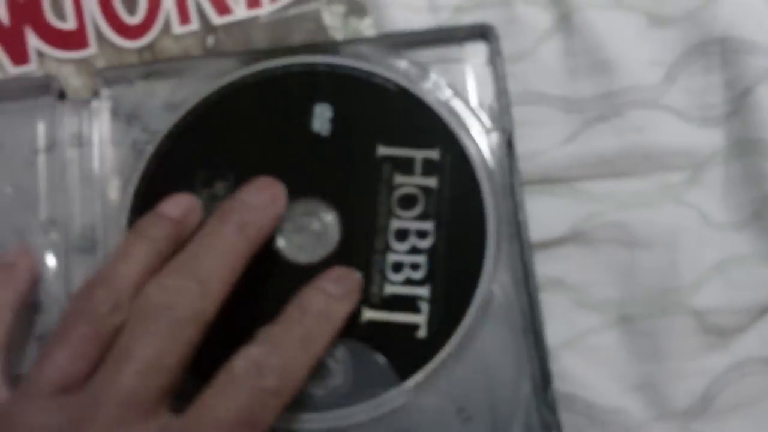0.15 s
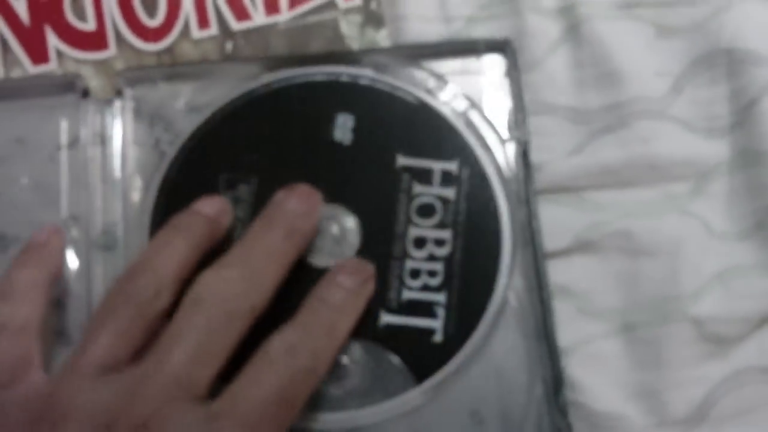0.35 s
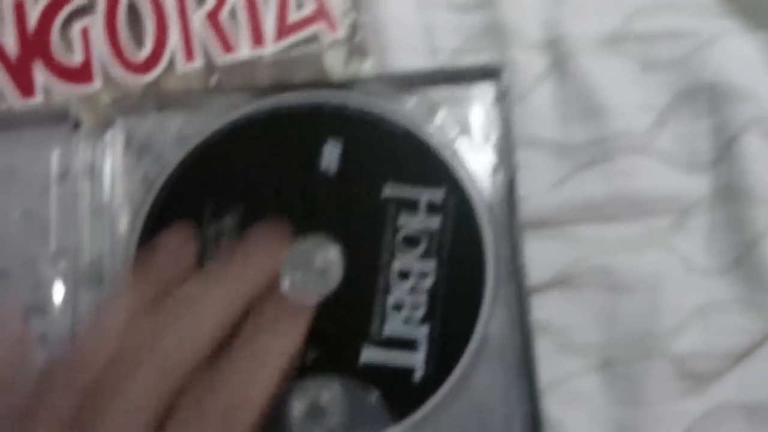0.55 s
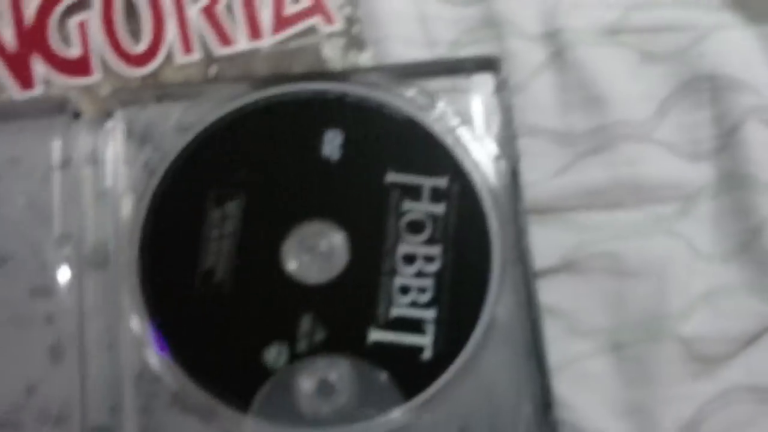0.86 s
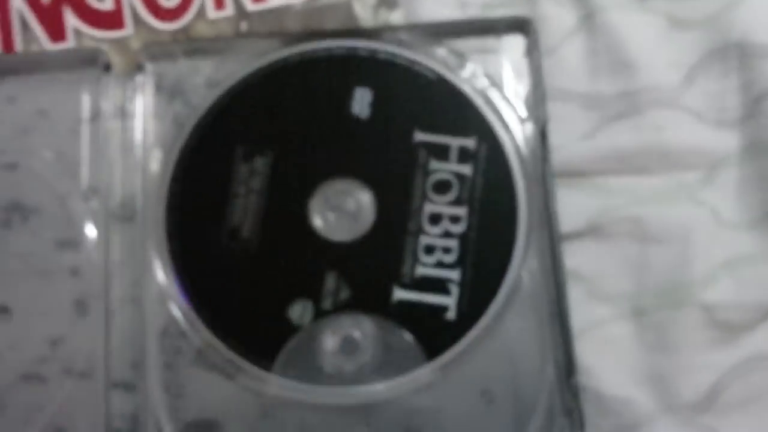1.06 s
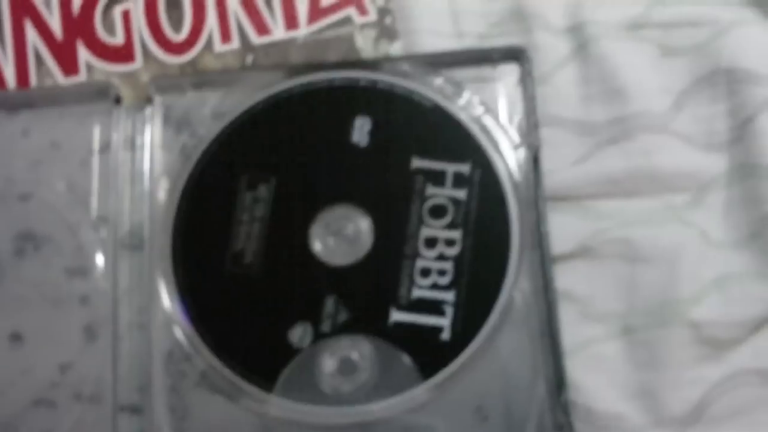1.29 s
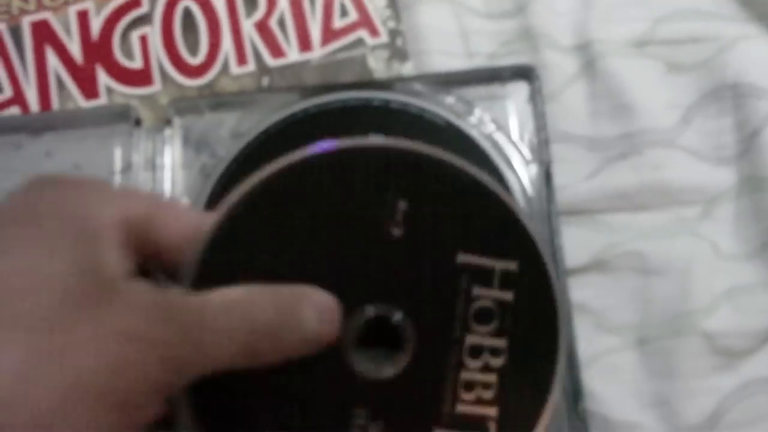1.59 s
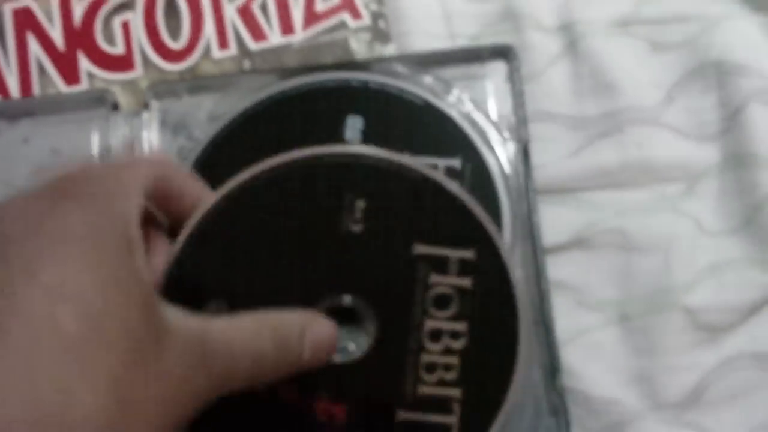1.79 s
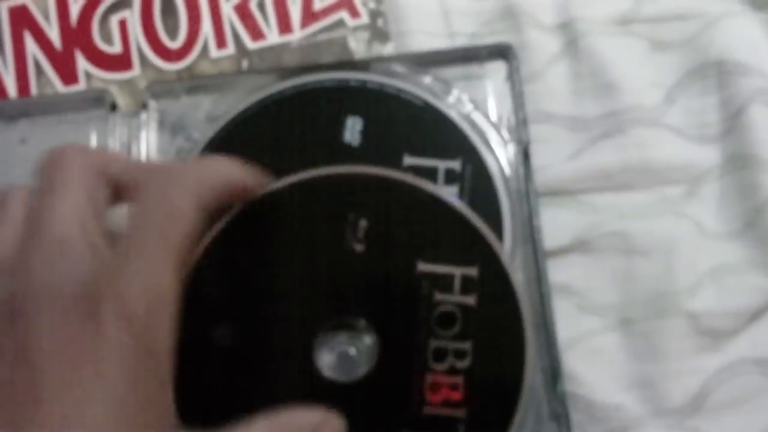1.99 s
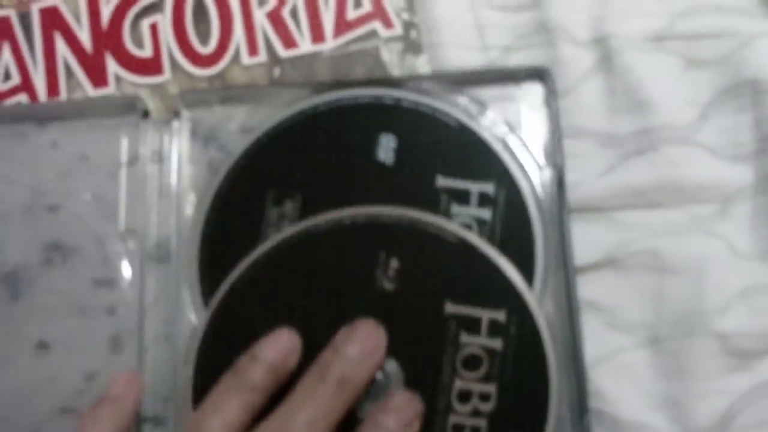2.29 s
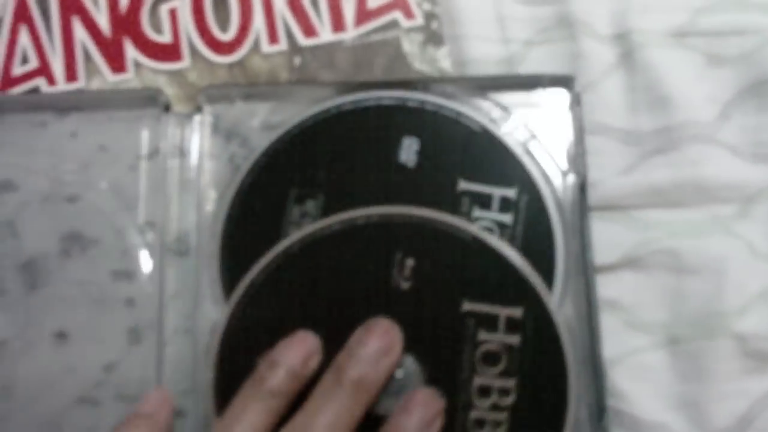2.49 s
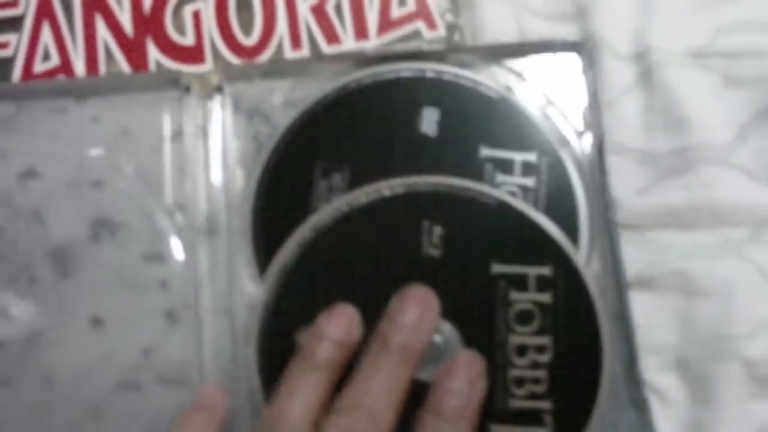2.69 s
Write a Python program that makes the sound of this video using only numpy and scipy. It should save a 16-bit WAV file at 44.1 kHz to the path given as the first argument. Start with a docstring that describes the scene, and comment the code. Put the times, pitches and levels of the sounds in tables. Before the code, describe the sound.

Discs click into a plastic case close to the microphone. One snaps down with a soft thump, then after a lull another taps, scrapes lightly and clicks home. Faint hiss fills the small room behind.

```python
"""Small, soft room, close microphone: a disc is pressed onto the hub of a plastic case lying on a bed.
A second disc is laid in, rattles into place and snaps home. Each contact knocks the case, rings the disc
and, where an edge slips off a catch, gives a very bright snap. The tray thumps against the bedding.
Fingers slide the disc; it scrapes over the hub and its rim squeaks on the tray.
Behind it: faint room noise, a high hiss that flares up, and a thin whine."""
import sys
import numpy as np
from scipy import signal
from scipy.fft import rfft, irfft, next_fast_len
from scipy.io import wavfile

SR = 44100
rng = np.random.default_rng(int(sys.argv[2]) if len(sys.argv) > 2 else 0)


def digitize_waveform(pressure):
    """Quantize a signal to 16-bit integers and store it at the path in sys.argv[1].

    Rows of a 2-D input are taken as channels; values are limited to [-1, 1].
    """
    field = np.atleast_2d(pressure).T
    bounded = np.clip(field, -1, 1)
    quanta = np.round(bounded * 32767).astype(np.int16)
    wavfile.write(sys.argv[1], SR, quanta)


N = 125685
TIME_S = np.arange(N) / SR
RING_S = np.arange(SR // 8) / SR  # time axis of one blow


def contacts():
    """Each contact knocks the case, rings the disc and snaps at an edge; small parts give little bass."""
    # (time [s], case level [dB], case centre [Hz], disc level [dB], disc centre [Hz],
    #  disc width [oct], snap level [dB])
    hits = [ (.1059, -20, 850, -13, 3000, 0.67, -2.5), (.161, -17.5, 1450, -27, 4200, 2.1, -8),
            (0.1693, -12.5, 1490, -15, 2580, 0.285, -39), (.202, -6.5, 1140, -8, 3340, 0.47, 6.5),
            (.205, -10, 1440, -3, 3300, 0.27, 2.5), (0.2057, -6.5, 697, -26, 4330, 0.6, 8),
            (0.75, -23, 664, -51, 2500, .5, -44), (.7628, -20, 364, -43, 2020, 0.68, -41),
            (1.208, -24.5, 800, -51, 2500, .5, -36), (1.2438, -24, 456, -18.5, 2320, 0.048, -26.5),
            (1.5133, -27.5, 520, -43, 2500, .5, -48), (1.5622, -5.5, 1100, -10, 2070, 0.17, -13.5),
            (1.6484, -20.5, 990, -33, 3000, .6, -25), (1.762, -16.5, 1150, -26, 3020, 1.2, -49),
            (1.769, -17, 1260, -24, 2290, 0.23, -38), (1.8003, -14.5, 1150, -23.5, 2500, 0.16, -17),
            (1.8025, -12, 1056, -10.5, 2414, 0.05, -40), (1.828, -19, 1560, -24, 3740, 1.4, -19.5),
            (2.0382, -26, 930, -19.5, 2460, 0.043, -25), (2.1067, -25, 890, -35, 2700, 0.89, -31),
            (2.1218, -26, 1300, -20.5, 2460, 0.17, -30), (2.1371, -6.5, 1550, -1.5, 2960, 0.68, -5.5),
            (2.1587, -20, 1500, -7.5, 2730, .4, -12), (2.163, -3.5, 1300, -20.5, 2650, 0.17, -4),
            (2.173, -33, 1300, -9, 3100, 0.18, -14), (2.1759, -7.5, 710, -9, 2630, 0.73, -15),
            (2.193, -9.5, 1610, -10, 3130, 0.68, -13), (2.2123, -19.5, 1550, -21.5, 3100, .5, -41),
            (2.229, -31, 1560, -27.5, 2910, 0.36, -44), (2.4203, -5, 1230, 1, 2420, 0.25, -1.5),
            (2.4328, -7.5, 1050, -2.5, 2660, 0.68, -6.5), (2.4392, -13, 1450, -10, 2580, 0.45, -17),
            (2.4787, -18.5, 1400, -20, 2840, 0.32, -23), (2.563, -5, 1550, -3, 2080, 0.45, -21),
            (2.5647, -6, 804, -7, 4020, 0.12, 2.5), (2.638, -24, 600, -43, 2500, .5, -42)]
    # plastic modes (frequency [Hz], level [dB], t60 [s])
    case_modes = [(265, -2.5, 0.025), (373, -5, 0.043), (558, -3, 0.055), (670, 1.5, 0.017),
                  (792, -2.5, 0.038), (924, -4.5, 0.045), (1147, -2.5, 0.038), (1295, 0.5, 0.016),
                  (1480, 0, 0.056), (1628, 5, 0.032), (2204, -1, 0.013)]
    disc_modes = [(2101, -7.5, 0.056), (2360, -6.5, 0.02), (2508, 0.5, 0.016), (2790, 0, 0.012),
                  (3050, -7.5, 0.026), (3850, -0.5, .016), (4297, 3, 0.0083), (5100, -10, .014),
                  (5950, -9, 0.015), (6390, -15.5, 0.01)]
    # spectra of the dense, fast-dying parts (frequency [Hz], level [dB])
    case_crack = [(40, -63), (120, -20.5), (200, -19.5), (300, 7.5), (420, -26.5), (600, 8), (1600, -8),
                  (2300, 0), (4000, -18.5)]
    disc_crack = [(200, -35), (900, 10), (2000, 6.5), (2700, -5), (4000, 7), (5000, -1.5), (6500, 0.5),
                  (8000, 2.5), (11000, -22.5), (16000, -41.5)]
    snap_spectrum = [(300, -45.5), (2000, -28), (5500, -12.5), (8000, -25), (10000, -22), (11500, -10),
                     (12700, -3.5), (14000, -12.5), (15200, 6), (16300, -30), (17300, -26)]
    out = np.zeros(N)
    for time_s, case_db, case_hz, disc_db, disc_hz, disc_oct, snap_db in hits:
        case = struck(case_modes, case_crack, case_hz, width_oct=0.59,
                      crack_db=-1.5, crack_t60_s=0.036, rise_s=0.00025)
        disc = struck(disc_modes, disc_crack, disc_hz, width_oct=disc_oct,
                      crack_db=-6, crack_t60_s=0.015, rise_s=0.00005)
        snap = crack(lambda hz: along(snap_spectrum, hz), t60_s=0.0062, rise_s=0.0006)
        add(out, time_s, in_room(amp(case_db) * case + amp(disc_db) * disc + amp(snap_db) * snap))
    low_cut = signal.butter(2, 210, "high", fs=SR, output="sos")
    return signal.sosfilt(low_cut, out)


def struck(modes, crack_spectrum, centre_hz, width_oct, crack_db, crack_t60_s, rise_s):
    """Blow on a plastic part: clear modes plus dense crack, weighted around one pitch; energy 1."""
    def focus_db(hz, steepness=1.16):
        offset_oct = np.log2((hz + 1) / centre_hz)
        return -10 * steepness * np.log10(1 + (2 * offset_oct / width_oct) ** 2)

    burst = crack(lambda hz: along(crack_spectrum, hz) + focus_db(hz), crack_t60_s, rise_s)
    mode_hz = np.transpose(modes)[0]
    return unit(ring(modes, focus_db(mode_hz)) + amp(crack_db) * burst)


def ring(modes, weight_db, scatter_db=2.5, detune=0.0059):
    """Damped modes; level, tuning and sign vary per blow; energy 1."""
    hz, db, t60_s = np.transpose(modes)
    level, tune, side = rng.standard_normal((3, len(hz)))
    gain = amp(db + weight_db + scatter_db * level) * np.sign(side)
    t = RING_S[:, None]
    partials = gain * amp(-60 * t / t60_s) * np.sin(2 * np.pi * hz * (1 + detune * tune) * t)
    return unit(partials.sum(1))


def crack(gain_db, t60_s, rise_s):
    """Many short-lived modes as a decaying noise burst; energy 1."""
    attack = 1 - np.exp(-(RING_S / rise_s) ** 2)
    decay = amp(-60 * RING_S / t60_s)
    return coloured(rng.standard_normal(len(RING_S)) * decay * attack, gain_db)


def thumps():
    """The tray bottoms out or a finger lands on it: a low push against the bedding."""
    # pushes (time [s], level [dB])
    pushes = [(0.201, -39), (0.2055, -9), (2.564, -25.5)]
    # push spectrum (frequency [Hz], level [dB])
    spectrum = [(20, -18), (60, 0.5), (150, -3.5), (270, 1), (450, -10.5), (900, -8), (3000, -47)]
    push = coloured(signal.unit_impulse(len(RING_S)), lambda hz: along(spectrum, hz))
    out = np.zeros(N)
    for time_s, db in pushes:
        add(out, time_s, in_room(amp(db) * push))
    return out


def friction():
    """Fingers and disc slide, the disc scrapes over the hub as it seats, its rim squeaks on the tray."""
    # strokes (middle [s], length [s], level [dB])
    slides = [(0.47, 0.065, -57.5), (1.225, 0.11, -57.5), (1.714, 0.056, -57), (1.84, 0.15, -57),
              (2.125, 0.019, -46.5), (2.68, 0.6, -61)]
    scrapes = [(2.127, 0.04, -46), (2.168, 0.029, -42)]
    squeaks = [(1.335, 0.014, -60), (2.36, 0.091, -62)]
    # friction spectra (frequency [Hz], level [dB])
    slide_spectrum = [(40, -42), (150, -33), (600, 3), (1400, -0.5), (2600, -8.5), (5000, -16),
                      (10000, -33), (16000, -33)]
    scrape_spectrum = [(300, -30), (1000, -20), (1550, 3), (2000, -6), (2550, 6.5), (3200, -5.5),
                       (5000, -12.5), (16000, -39)]
    squeak_spectrum = [(3000, -10), (4000, -16), (4350, -1), (4700, -17), (6000, -30)]
    return (rubbing(slides, slide_spectrum) + rubbing(scrapes, scrape_spectrum)
            + rubbing(squeaks, squeak_spectrum))


def rubbing(strokes, spectrum):
    """Grainy friction noise that swells and fades with each stroke."""
    envelope = sum(amp(db) * np.exp(-(2 * (TIME_S - middle_s) / length_s) ** 2)
                   for middle_s, length_s, db in strokes)
    white = rng.standard_normal(N)
    grains = rng.rayleigh(size=N // 64 + 1).repeat(64)[:N]
    return envelope * shaped(white * grains, spectrum)


def whine():
    """Thin, steady high tones, widened by random phase drift."""
    # tones (frequency [Hz], rms level [dB], linewidth [Hz])
    tones = [(11090, -82, 25), (15708, -65, 3)]
    out = np.zeros(N)
    for hz, db, width_hz in tones:
        drift_rad = np.cumsum(rng.standard_normal(N)) * np.sqrt(2 * np.pi * width_hz / SR)
        out += amp(db) * np.sqrt(2) * np.sin(2 * np.pi * hz * TIME_S + drift_rad)
    return out


def hiss(floor_db=-57.5, ramp_s=0.0105, buzz_hz=157, buzz_depth=0.42, top_hz=15900):
    """Steady room noise plus a high, buzzing hiss that flares up now and then."""
    # flare-ups (start [s], end [s], level [dB])
    flares = [(0.066, 0.088, -53), (.27, 0.282, -50.5), (.57, .595, -51.5), (.77, 0.792, -51),
              (0.968, .995, -52), (1.197, 1.22, -57), (1.267, 1.302, -52), (1.67, 1.694, -51),
              (1.869, 1.894, -51.5), (2.069, 2.101, -51.5), (2.47, 2.495, -51), (2.603, 2.84, -51)]
    # noise spectra (frequency [Hz], level [dB])
    floor_spectrum = [(12, -33), (20, 4), (64, -16.5), (122, -13), (148, -16), (372, -9.5), (465, -11),
                      (686, -9), (1070, -11), (1200, -11.5), (1300, -12.5), (1630, -12.5), (1820, -13.5),
                      (3960, -20), (8400, -30.5), (13900, -23.5), (15500, -16.5)]
    flare_spectrum = [(1000, -26), (6000, -20), (10500, -22), (12200, -14), (13500, -1), (14800, 0.5),
                      (15700, 3.5), (16100, -46)]
    envelope = sum(amp(db) * np.clip(np.minimum(TIME_S - start_s, end_s - TIME_S) / ramp_s + 0.5, 0, 1)
                   for start_s, end_s, db in flares)
    buzz = 1 + buzz_depth * np.sin(2 * np.pi * buzz_hz * TIME_S)
    floor = amp(floor_db) * shaped(rng.standard_normal(N), floor_spectrum)
    flare = envelope * buzz * shaped(rng.standard_normal(N), flare_spectrum)
    return filtered(floor + flare, lambda hz: hz < top_hz)


def in_room(sound):
    """Direct sound plus a short diffuse tail, 5 ms later."""
    # room decay (frequency [Hz], t60 [s])
    decay = [(150, 0.13), (1500, 0.2), (4000, 0.15), (15000, 0.14)]
    # tail gain (frequency [Hz], level [dB])
    send = [(100, -24), (600, -17), (1100, -18), (1550, -11.5), (2100, -20), (3000, -16), (7000, -23),
            (15000, -21.5)]
    hz, t, bands = signal.stft(rng.standard_normal(SR // 3), SR, nperseg=256)
    bands = bands * amp(-60 * t / along(decay, hz)[:, None])
    tail = unit(signal.istft(bands, SR, nperseg=256)[1])
    tail = filtered(tail, lambda f: amp(along(send, f)))
    return signal.fftconvolve(sound, np.concatenate([[1], np.zeros(SR // 200), tail]))


def amp(db):
    """Decibels to gain."""
    return 10 ** (np.asarray(db) / 20)


def along(points, hz):
    """Interpolate (frequency [Hz], value) points on a log axis."""
    point_hz, values = np.transpose(points)
    return np.interp(np.log(hz + 1), np.log(point_hz + 1), values)


def unit(x):
    """Scale to energy 1."""
    return x / np.sqrt(np.sum(x ** 2) + 1e-20)


def filtered(x, gain):
    """Zero-phase filter with response gain(hz)."""
    size = next_fast_len(len(x) + 8192)
    return irfft(rfft(x, size) * gain(np.fft.rfftfreq(size, 1 / SR)), size)[:len(x)]


def shaped(x, spectrum):
    """Filter by (frequency [Hz], level [dB]) points; rms 1."""
    return unit(filtered(x, lambda hz: amp(along(spectrum, hz)))) * np.sqrt(len(x))


def coloured(x, gain_db):
    """Minimum-phase filter with response gain_db(hz); energy 1."""
    size = 16384
    log_gain = np.log(amp(gain_db(np.fft.rfftfreq(size, 1 / SR))))
    cepstrum = irfft(log_gain)
    cepstrum[size // 2:] = 0  # causal half only
    response = np.exp(rfft(2 * cepstrum))
    return unit(irfft(rfft(x, size) * response)[:len(x)])


def add(track, time_s, sound):
    """Mix a sound into the track."""
    part = track[max(0, round(time_s * SR)):][:len(sound)]
    part += sound[:len(part)]


def scene():
    """All sources at one microphone."""
    return (friction() + contacts() + thumps() + whine() + hiss())[None]


def record(dry):
    """Band limit at 17 kHz."""
    return np.array([filtered(x, lambda hz: hz < 17000) for x in dry])


dry = scene()
out = record(dry)
digitize_waveform(out)
```